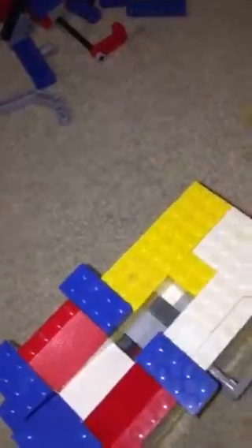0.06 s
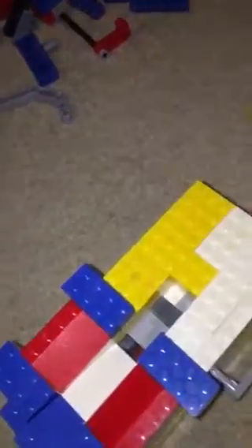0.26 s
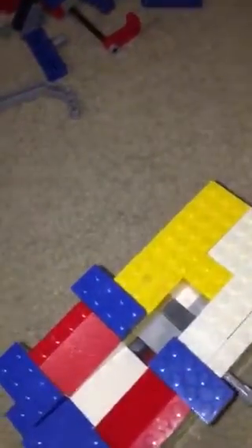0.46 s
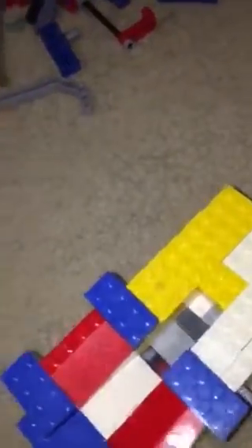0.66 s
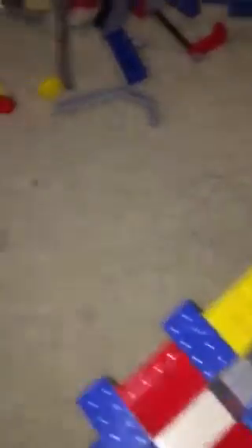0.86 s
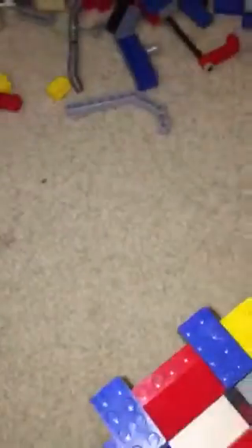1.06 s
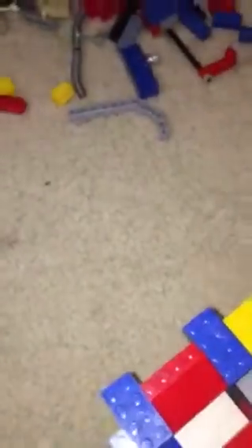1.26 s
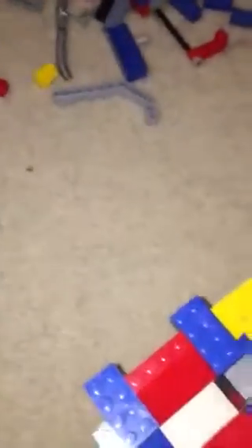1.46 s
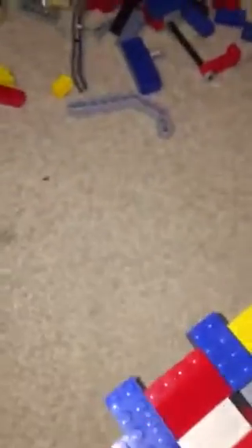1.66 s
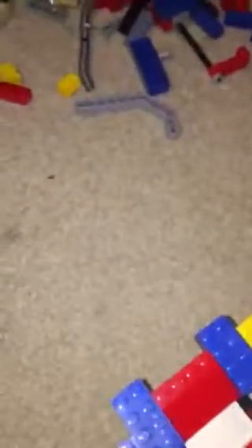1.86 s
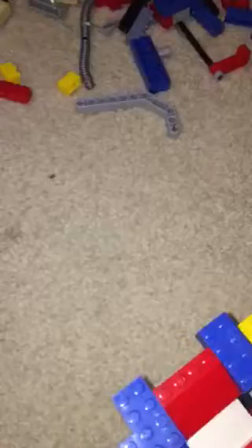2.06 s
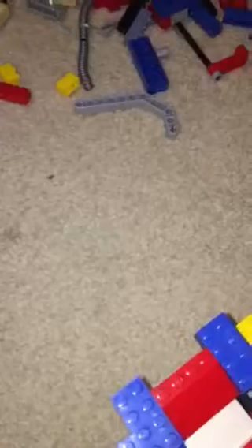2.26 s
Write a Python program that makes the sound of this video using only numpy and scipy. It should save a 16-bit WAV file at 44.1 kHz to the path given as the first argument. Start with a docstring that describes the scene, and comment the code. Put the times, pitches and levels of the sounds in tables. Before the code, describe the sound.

A brief clatter of plastic toy bricks, followed by scattered small clicks in a quiet room.

```python
"""Over a low room rumble and a soft handling thump, plastic bricks and small balls tumble onto carpet in a
quick clatter (0.2-0.6 s). Each contact sounds in four parts: a hollow thud, a bright ring, a crack and a fine
tick from the hard edges. A small, quiet room answers. Then loose pieces click now and then (to 2.3 s), with
more soft thumps and a faint rustle near 1 s."""
import sys
import numpy as np
from scipy import signal
from scipy.fft import rfft, irfft
from scipy.io import wavfile

SR = 44100
rng = np.random.default_rng(int(sys.argv[2]) if len(sys.argv) > 2 else 0)


def generate_wav(sig):
    """Save sig (samples, or channels by samples) to the path in sys.argv[1] as 16-bit PCM at SR."""
    pcm = np.round(np.clip(np.atleast_2d(sig).T, -1, 1) * 32767).astype(np.int16)
    wavfile.write(sys.argv[1], SR, pcm)


N = 101429

# main contacts: t/s, thud/dB, ring/dB, crack/dB, tick/dB
CLATTER_HITS = [(0.2456, 13, 14, 10, -0.5), (0.2539, -5.5, 4.5, -11, -20.5), (0.2638, -14, 0.5, -12.5, 3),
                (0.273, 7.5, 12.5, 5.5, -5.5), (0.2796, -8.5, 5, -6, -7.5), (0.2903, -11.5, -0.5, -12, -20),
                (0.3141, -10.5, 3.5, -3, -4), (0.319, -7.5, 6, 2.5, 0.5), (0.3302, 4.5, 13, 2.5, -1),
                (0.334, -3.5, 3, -7.5, -16), (0.3588, -13.5, -2, -15, -10.5), (0.3645, -11, 8.5, -3, -1),
                (0.3685, -14, 5, -7, -14.5), (0.3945, -16.5, -0.5, -16.5, -14.5),
                (0.401, -2.5, 4, -5.5, -11), (0.41, -7.5, 8, 3.5, -9.5), (0.4318, -18, 0.5, -10.5, -21),
                (0.4396, -19.5, -4.5, -12, -22), (0.4455, -41, -9, -14, -6.5), (0.4472, -20, 4.5, -5, -7),
                (0.4518, -24, -0.5, -14, -15), (0.4695, -15, 0.5, -11, -16), (0.4741, -14.5, -1, -10, -25),
                (0.4862, -35, -8, -16.5, -33), (0.505, -30.5, -8.5, -22, -12.5),
                (0.5217, -24, -4.5, -6, -21), (0.527, -13, 7, -3, -13.5), (0.5445, -33, -3.5, -11, -29),
                (0.5489, -30, -5.5, -8.5, -27), (0.5795, -28, -24, -30, -18.5), (0.589, -36, -14, -24, -22),
                (0.612, -23, -13.5, -18, -25)]
# hollow modes of the brick assembly: f/Hz, level/dB
HOLLOW_MODES = [(283, -6.5), (334, 2), (406, 1), (445, -1.5), (560, -3), (666, -4.5)]
# ring tones of the clatter: f/Hz, level/dB
RING_TONES = [(735, -15), (848, -5), (900, 0.5), (955, 0.5), (1010, 1), (1075, -2), (1190, -4), (1390, -9),
              (1627, -5), (1815, -3), (1925, -1), (2100, -5)]
# envelope of the dense crack modes: f/Hz, level/dB
CRACK_SHAPE = [(2200, -1), (3150, 0.5), (3700, -2), (4600, -1), (6500, -3), (8500, -14.5)]
# envelope of the dense edge modes: f/Hz, level/dB
TICK_SHAPE = [(5800, -9.5), (7500, 2.5), (9300, 5), (12000, -0.5), (16500, -2.5)]
# single pieces: t/s, thud/dB, ring/dB, crack/dB, tick/dB, f1/Hz, f2/Hz, f3/Hz
PIECE_HITS = [(0.6672, -32.5, -18.5, -25.5, -18.5, 1500, 1800, 1110),
              (0.6985, -26, -14, -23.5, -25.5, 928, 1516, 1850),
              (0.725, -27, -22, -29.5, -26, 2050, 956, 1320), (0.755, -34, -33, -42, -25, 935, 690, 1520),
              (0.7738, -29, -21.5, -43, -46, 1880, 664, 1336),
              (0.956, -21.5, -9, -13, -9.5, 1160, 1933, 970),
              (1.1801, -32.5, -30.5, -33.5, -24.5, 1990, 2604, 1230),
              (1.2819, -32, -11, -21, -16.5, 1876, 1006, 2350),
              (1.3577, -50, -26.5, -38.5, -30, 1580, 2140, 1015),
              (1.498, -35, -23, -31, -31.5, 1937, 1690, 593),
              (1.5222, -19.5, -6, -15, -21, 2067, 1420, 1194),
              (1.5387, -28, -16, -26, -29.5, 1456, 1030, 1980),
              (1.6317, -28.5, -18, -24.5, -30.5, 1166, 1720, 630),
              (1.9185, -47.5, -26.5, -33.5, -41.5, 1782, 2334, 1210),
              (2.0704, -42.5, -22.5, -33.5, -47, 1406, 1672, 2100),
              (2.0968, -17, 0, -3.5, -18.5, 1240, 1449, 2370),
              (2.1029, -29.5, -3.5, -5.5, -16, 1360, 1235, 2750),
              (2.2667, -39, -13.5, -20.5, -33, 1494, 2366, 1140),
              (2.27, -25, -8, -12, -18.5, 2265, 970, 1476),
              (2.2753, -31.5, -11.5, -14.5, -26, 913, 1450, 2240)]
# a piece's modes f1..f3: level/dB, t60/s
PIECE_RING = [(-4, 0.031), (-4.5, 0.031), (-4.5, 0.024)]
# envelope of a piece's dense modes: f/Hz, level/dB
PIECE_SHAPE = [(600, -7.5), (1100, -7), (2000, 1.5), (2900, -10)]
# contour of the light touches: t/s, level/dB
JOSTLE_CONTOUR = [(.225, -40), (0.242, -24), (.25, -15), (.34, -11), (.45, -23.5), (.57, -15.5),
                  (0.645, -27.5)]
# offsets from that contour: thud/dB, ring/dB, crack/dB, tick/dB
JOSTLE_OFFSETS_DB = [-17.5, -1.5, -9, -15]
# reflections: f/Hz, level/dB, t60/s
ROOM_BANDS = [(247.8, -15, 0.084), (995, -13, .21), (2450, -9, 0.165), (8000, -15.5, 0.2),
              (16000, -11, .18)]
# handling thumps: t/s, level/dB
THUMPS = [(.045, -58.5), (0.743, -50.5), (1.003, -53.5), (1.386, -56.5), (1.519, -55)]
# rustle band: low/Hz, high/Hz
RUSTLE_EDGES_HZ = [2340, 7100]
# background noise density: f/Hz, relative level/dB
AIR_SHAPE = [(20, -26.5), (118, -5), (190, -19), (249, -10), (300, -21), (607, -28.5), (1070, -22),
             (2350, -26.5), (3160, -33.5), (16000, -46.5)]

THUD_T60_S, CRACK_T60_S, TICK_T60_S = 0.043, 0.02, 0.011
RING_T60_1KHZ_S, RING_DAMPING_EXPONENT = 0.031, 0.27
THUD_LOW_HZ = 170   # the small assembly radiates little below this
BUMP_HZ, BUMP_T60_S, BUMP_DB = 90, .03, -28.5   # the floor gives under a thud
STRIKE_SPREAD_DB, DETUNE = 1.46, .013   # the strike point varies each mode's strength and pitch
CONTACT_S = .0009   # a piece's corners touch within this time
RISE_CYCLES, SNAP_DB = .45, -2.5
PIECE_DENSE_DB, PIECE_DENSE_T60_S, PIECE_ROOM_DB = -6, 0.024, -1
PIECE_TOP_HZ = 11900   # softer knocks, duller top
JOSTLES_PER_S, JOSTLE_SPREAD_DB = 180, 2.5
ROOM_DELAY_S, AIR_DB = 0.0051, -62.5
THUMP_HZ, THUMP_RISE_S = 116, .016
RUSTLE_AT_S, RUSTLE_WIDTH_S, RUSTLE_DB = 0.95, 0.15, -71
CUTOFF_HZ = 16500
RING_TIME_S = np.arange(int(.06 * SR)) / SR


def clatter():
    """Main contacts of the tumble, all on the same assembly."""
    out = np.zeros(N)
    for start_s, *levels_db in CLATTER_HITS:
        add(out, start_s, contact(levels_db, clatter_ring()))
    return out


def contact(levels_db, ring):
    """One knock: thud with floor bump, the given ring, crack, and a tick opening with a sharp pulse."""
    low_cut = signal.butter(2, THUD_LOW_HZ, "high", fs=SR, output="sos")
    hollow = modes(*np.transpose(HOLLOW_MODES), THUD_T60_S)
    bump = from_db(BUMP_DB) * modes(BUMP_HZ, 0, BUMP_T60_S)
    thud = unit_energy(signal.sosfilt(low_cut, hollow)) + bump
    crack = dense_modes(CRACK_SHAPE, CRACK_T60_S, count=40)
    edge_band = signal.butter(2, [TICK_SHAPE[0][0], CUTOFF_HZ], "band", fs=SR, output="sos")
    pulse = signal.unit_impulse(len(RING_TIME_S), int(CONTACT_S * SR))
    snap = from_db(SNAP_DB) * unit_energy(signal.sosfilt(edge_band, pulse))
    tick = unit_energy(dense_modes(TICK_SHAPE, TICK_T60_S, count=64) + snap)
    return from_db(levels_db) @ np.array([thud, ring, crack, tick])


def clatter_ring():
    """Ring of each main contact; higher tones die sooner."""
    hz, db = np.transpose(RING_TONES)
    return modes(hz, db, RING_T60_1KHZ_S * (hz / 1000) ** -RING_DAMPING_EXPONENT)


def modes(hz, db, t60_s):
    """Damped sines from one contact, each with its own strength, phase and onset; energy 1."""
    hz, db, t60_s = (np.reshape(v, (-1, 1)) for v in (hz, db, t60_s))
    strength, detune = rng.standard_normal((2, len(hz), 1))
    phase, lag = rng.random((2, len(hz), 1))
    t = np.maximum(RING_TIME_S - lag * CONTACT_S, 0)
    rise = 1 - np.exp(-(t * hz / RISE_CYCLES) ** 2)
    decay = np.exp(-np.log(1000) * t / t60_s)
    wave = np.sin(2 * np.pi * (hz * (1 + DETUNE * detune) * t + phase))
    gain = from_db(db + STRIKE_SPREAD_DB * strength)
    return unit_energy(np.sum(gain * rise * decay * wave, axis=0))


def dense_modes(shape, t60_s, count):
    """Modes scattered under a spectral envelope, new for each contact."""
    low_hz, high_hz = shape[0][0], shape[-1][0]
    hz = low_hz * (high_hz / low_hz) ** ((np.arange(count) + rng.random(count)) / count)
    return modes(hz, at_hz(shape, hz), t60_s)


def clicks():
    """Single pieces knock, each with three pitches of its own over weaker dense modes."""
    out = np.zeros(N)
    for start_s, *levels_db, f1_hz, f2_hz, f3_hz in PIECE_HITS:
        dense = from_db(PIECE_DENSE_DB) * dense_modes(PIECE_SHAPE, PIECE_DENSE_T60_S, count=22)
        pitched = modes([f1_hz, f2_hz, f3_hz], *np.transpose(PIECE_RING))
        add(out, start_s, contact(levels_db, unit_energy(pitched + dense)))
    return signal.sosfilt(signal.butter(1, PIECE_TOP_HZ, fs=SR, output="sos"), out)


def jostle():
    """Light random touches between the main contacts, dying away as the pieces settle."""
    out = np.zeros(N)
    times_s, levels_db = np.transpose(JOSTLE_CONTOUR)
    for slot_s in np.arange(times_s[0], times_s[-1], 1 / JOSTLES_PER_S):
        start_s = slot_s + rng.random() / JOSTLES_PER_S
        scatter_db = JOSTLE_SPREAD_DB * rng.standard_normal(len(JOSTLE_OFFSETS_DB))
        db = np.interp(start_s, times_s, levels_db) + scatter_db + JOSTLE_OFFSETS_DB
        add(out, start_s, contact(db, clatter_ring()))
    return out


def room(x):
    """Diffuse reflections; level and decay per octave."""
    t = np.arange(SR // 2) / SR
    edges_hz = np.geomspace(70, 18000, 9)
    response = 0
    for low_hz, high_hz in zip(edges_hz, edges_hz[1:]):
        hz = np.sqrt(low_hz * high_hz)
        decay = np.exp(-np.log(1000) * t / at_hz(ROOM_BANDS, hz, column=2))
        tail = rng.standard_normal(len(t)) * decay * (t > ROOM_DELAY_S)
        octave = signal.butter(2, [low_hz, high_hz], "band", fs=SR, output="sos")
        gain = from_db(at_hz(ROOM_BANDS, hz)) * np.sqrt(2 * (high_hz - low_hz) / SR)
        response = response + gain * unit_energy(signal.sosfilt(octave, tail))
    return signal.fftconvolve(x, response)[:N]


def handling():
    """Soft low thumps as things are moved."""
    out, t = np.zeros(N), np.arange(SR // 4) / SR
    swell = t / THUMP_RISE_S * np.exp(1 - t / THUMP_RISE_S)
    for start_s, db in THUMPS:
        add(out, start_s, from_db(db) * swell * np.sin(2 * np.pi * (THUMP_HZ * t + rng.random())))
    return out


def rustle():
    """One faint swell of high noise."""
    band = signal.butter(2, RUSTLE_EDGES_HZ, "band", fs=SR, output="sos")
    hiss = signal.sosfilt(band, rng.standard_normal(N))
    swell = np.exp(-((np.arange(N) / SR - RUSTLE_AT_S) / RUSTLE_WIDTH_S) ** 2)
    return from_db(RUSTLE_DB) * swell * unit_energy(hiss) * np.sqrt(N)


def background():
    """Steady, faint room rumble and hiss."""
    hz = np.maximum(np.arange(N // 2 + 1) * SR / N, 1)
    air = irfft(rfft(rng.standard_normal(N)) * from_db(at_hz(AIR_SHAPE, hz)), N)
    return from_db(AIR_DB) * unit_energy(air) * np.sqrt(N)


def from_db(db):
    """Decibels to gain."""
    return 10 ** (np.asarray(db) / 20)


def unit_energy(x):
    """Scale to a sum of squares of 1."""
    return x / np.sqrt(np.sum(x ** 2) + 1e-20)


def at_hz(table, hz, column=1):
    """Interpolate a column over log frequency."""
    table = np.array(table)
    return np.interp(np.log(hz), np.log(table[:, 0]), table[:, column])


def add(out, start_s, sound):
    """Mix a sound in at start_s."""
    start = int(start_s * SR)
    out[start:start + len(sound)] += sound[:N - start]


def scene():
    """Pieces, room and background; mono."""
    quiet = background() + handling() + rustle()
    tumble = clatter()
    singles = clicks()
    tumble += jostle()
    reflections = room(tumble + from_db(PIECE_ROOM_DB) * singles)
    return (tumble + singles + reflections + quiet)[None]


def record(dry):
    """Soft peak limit, then a steep low-pass."""
    ceiling = .75
    rounded = dry / (1 + (dry / ceiling) ** 4) ** .25
    return signal.sosfilt(signal.ellip(10, .2, 70, CUTOFF_HZ, fs=SR, output="sos"), rounded)


dry = scene()
out = record(dry)
generate_wav(out)
```